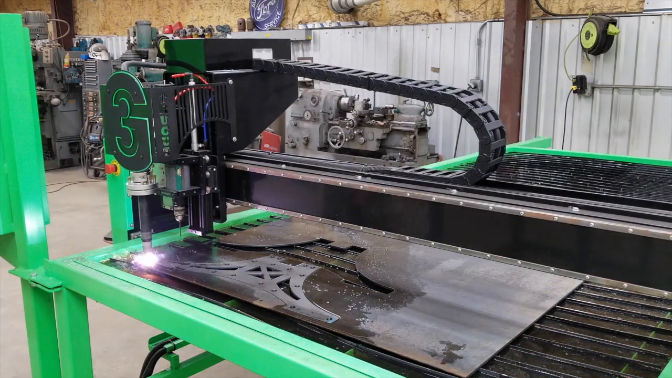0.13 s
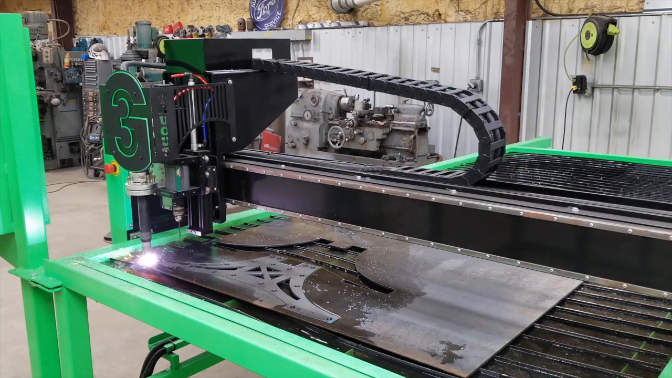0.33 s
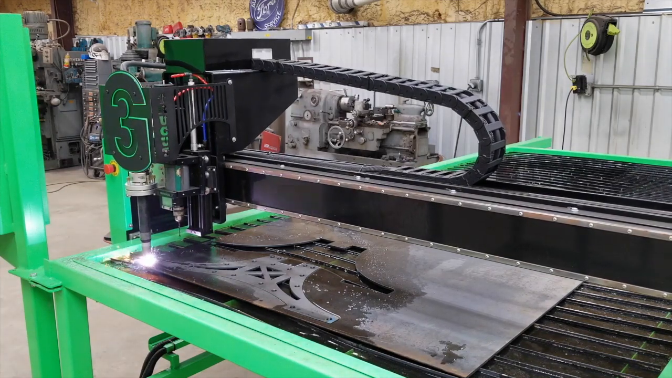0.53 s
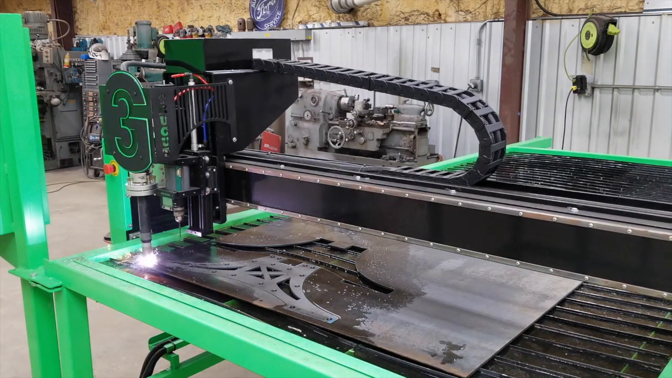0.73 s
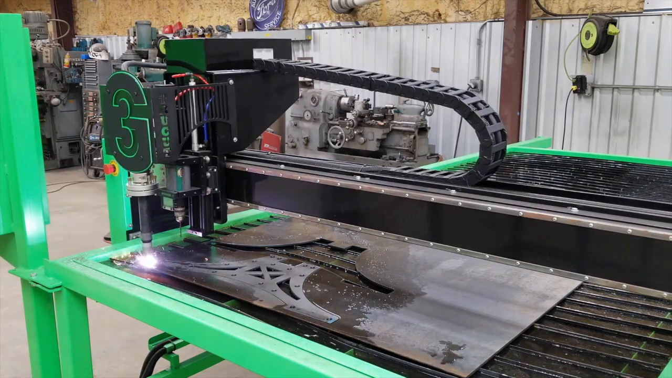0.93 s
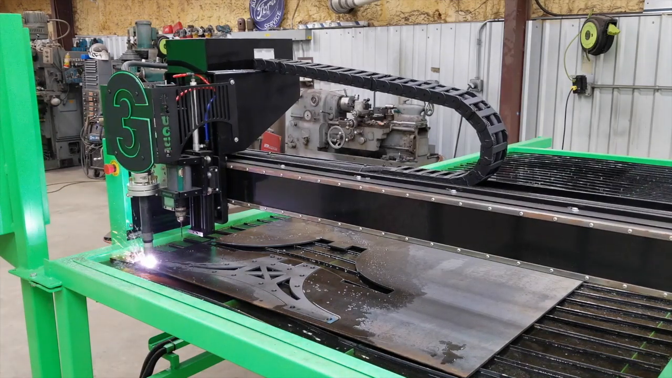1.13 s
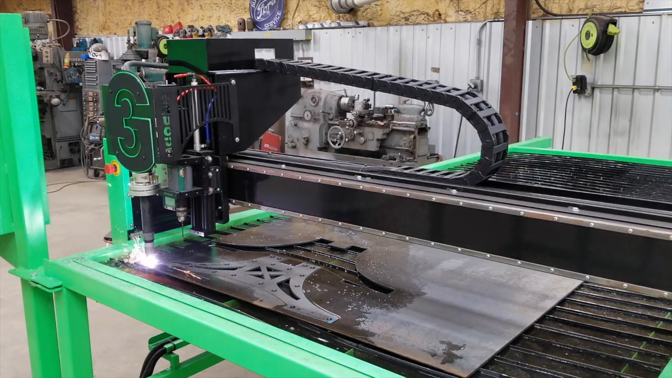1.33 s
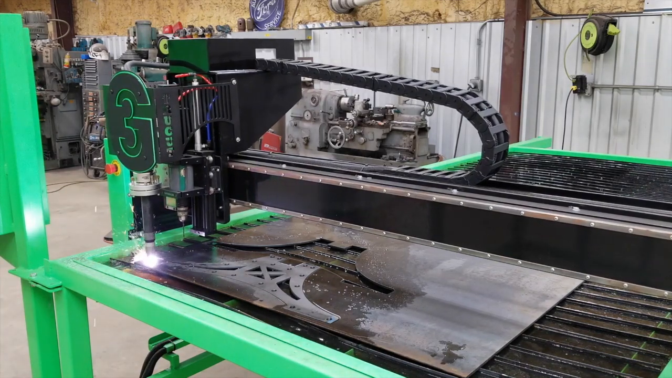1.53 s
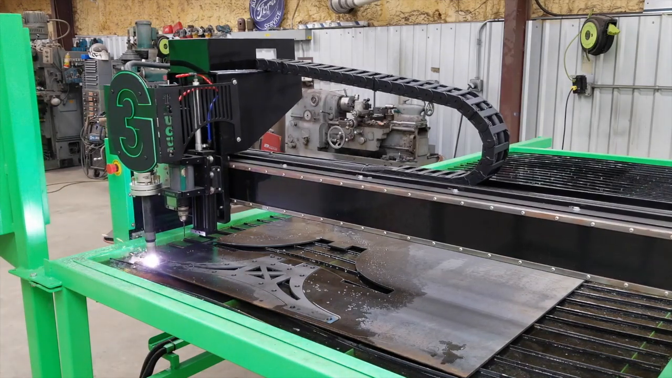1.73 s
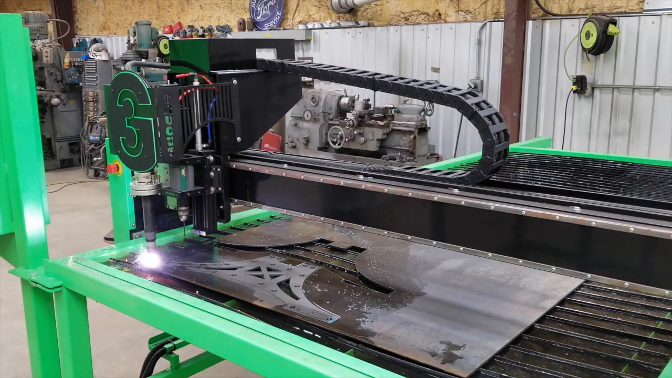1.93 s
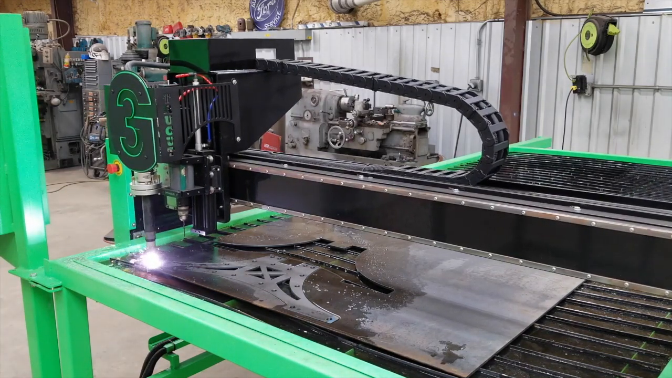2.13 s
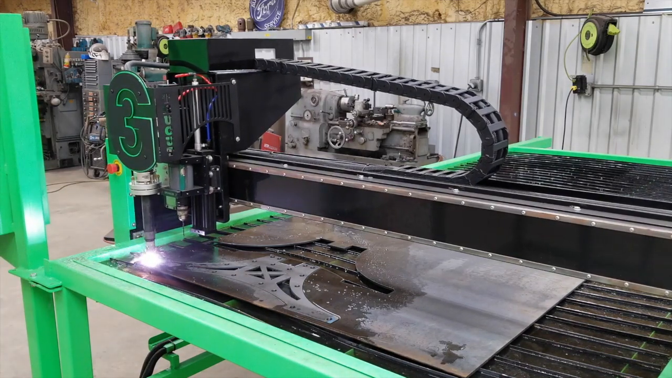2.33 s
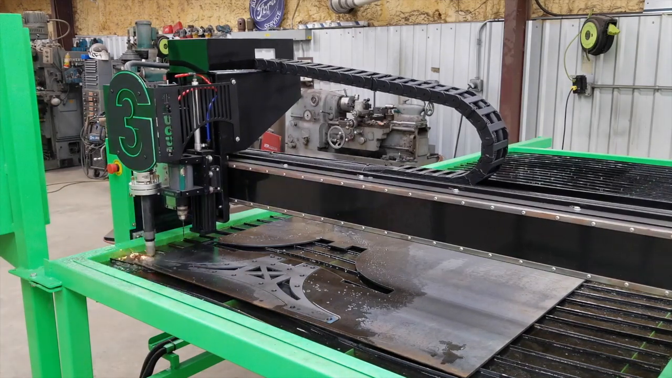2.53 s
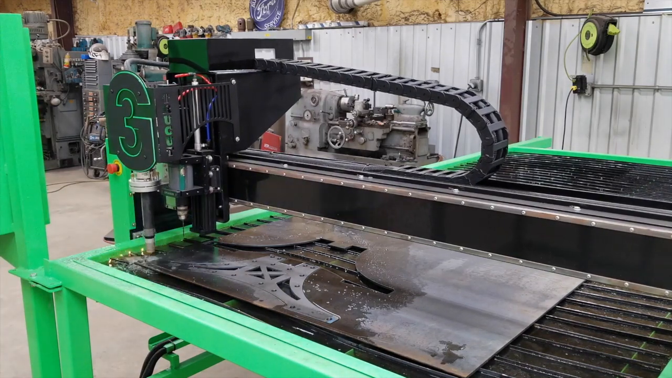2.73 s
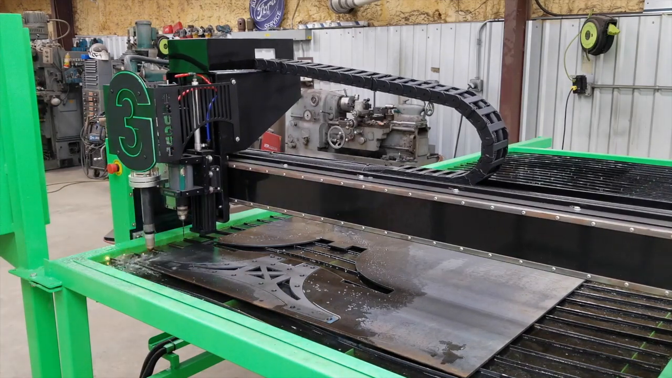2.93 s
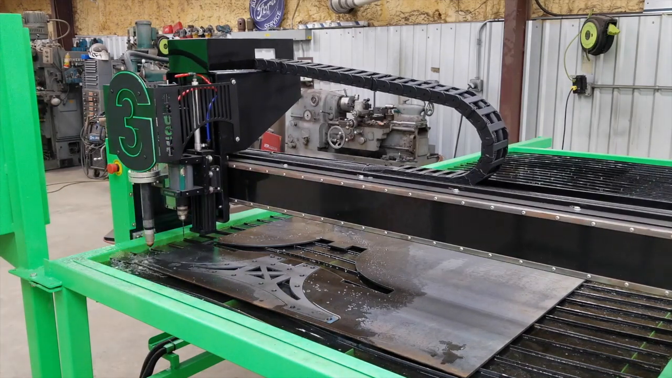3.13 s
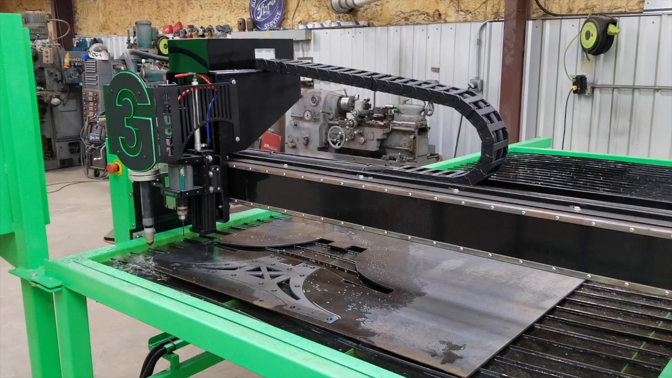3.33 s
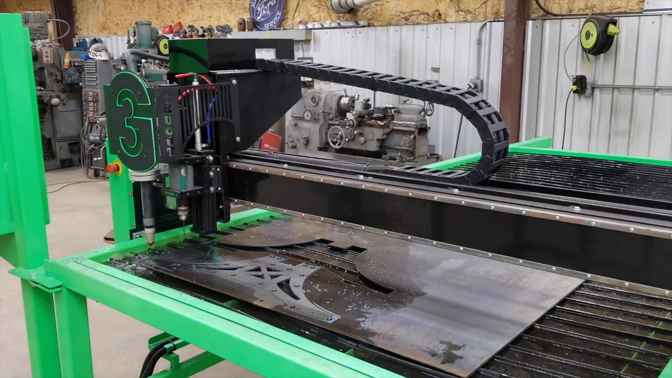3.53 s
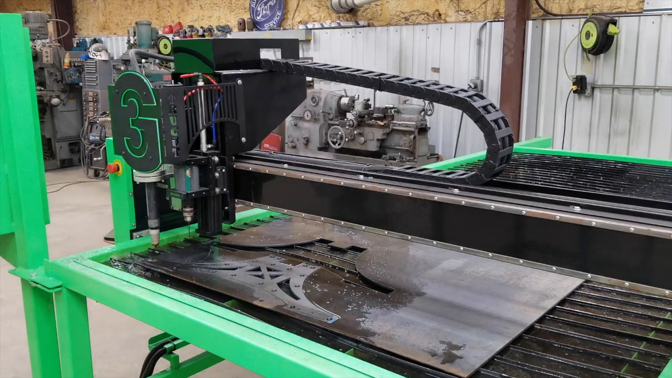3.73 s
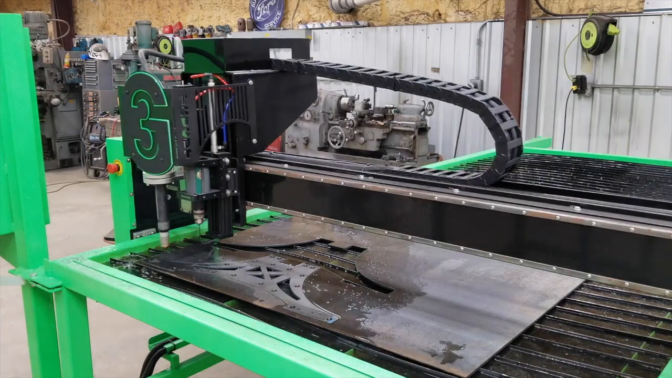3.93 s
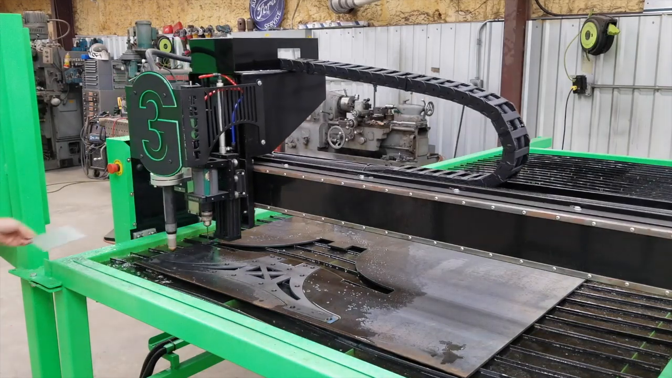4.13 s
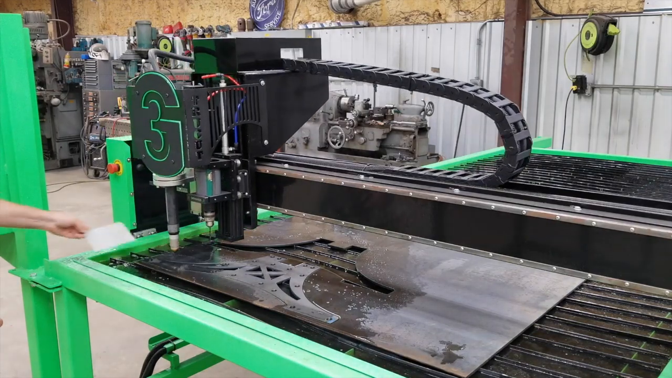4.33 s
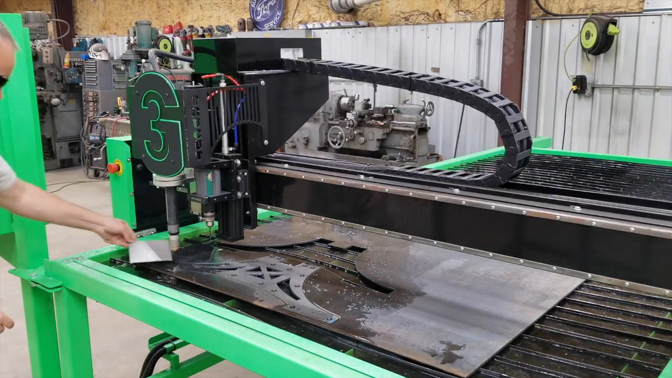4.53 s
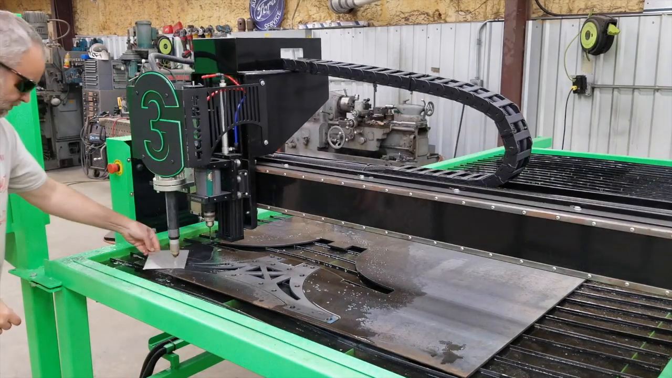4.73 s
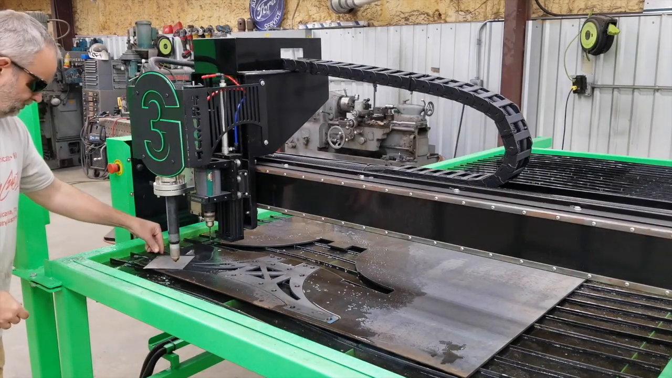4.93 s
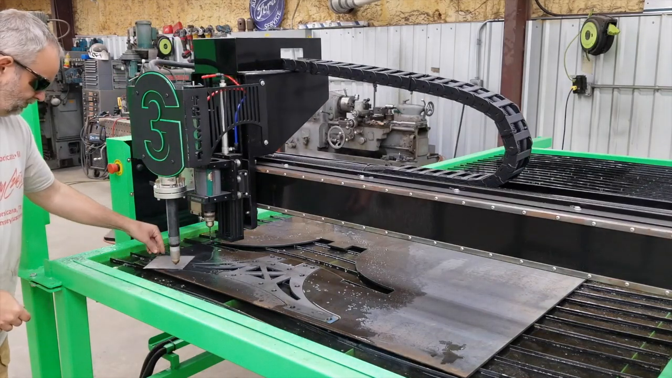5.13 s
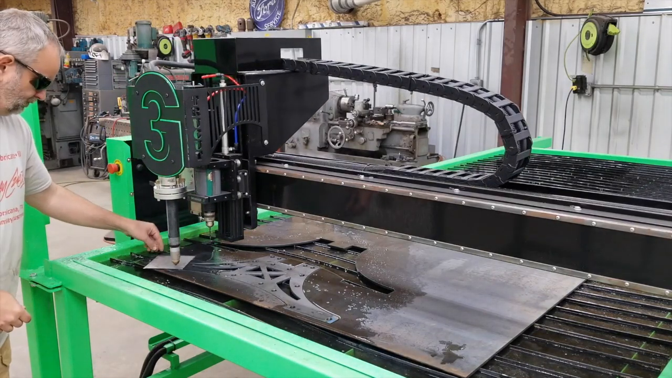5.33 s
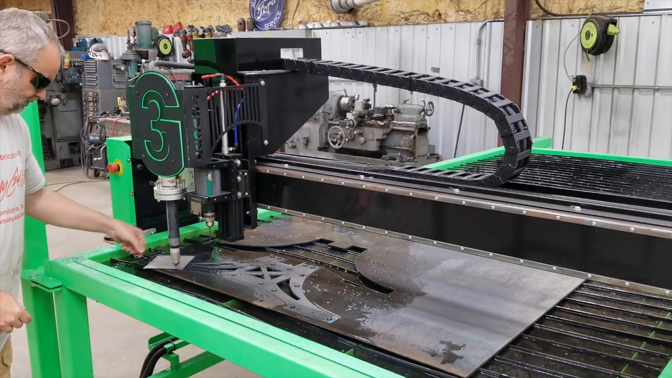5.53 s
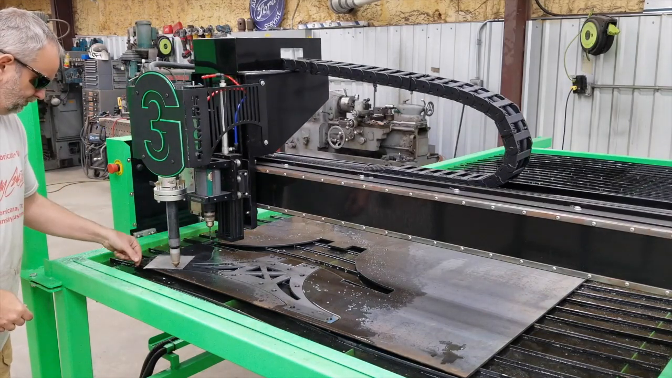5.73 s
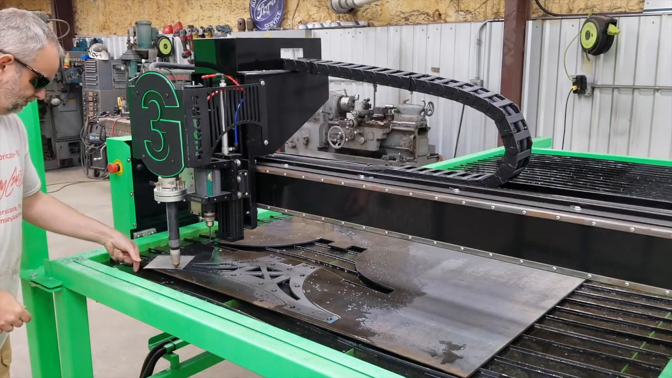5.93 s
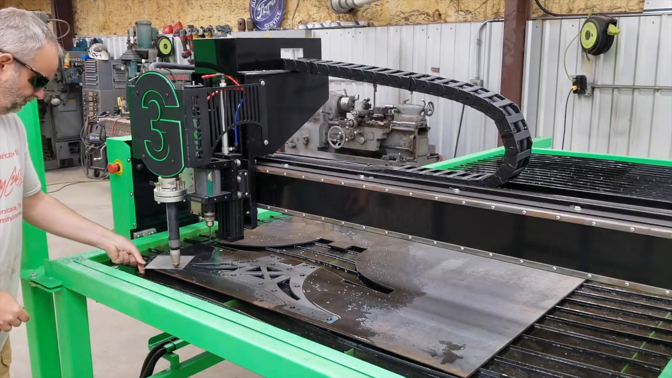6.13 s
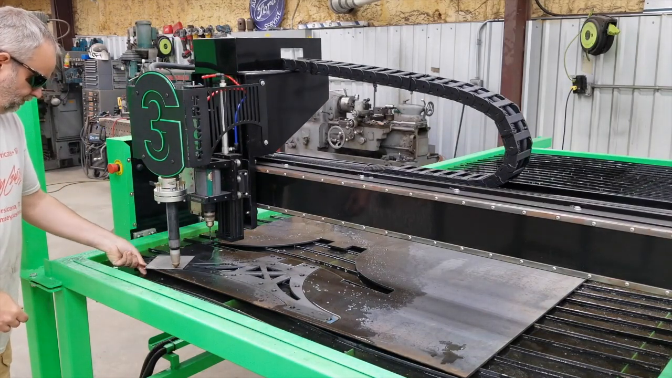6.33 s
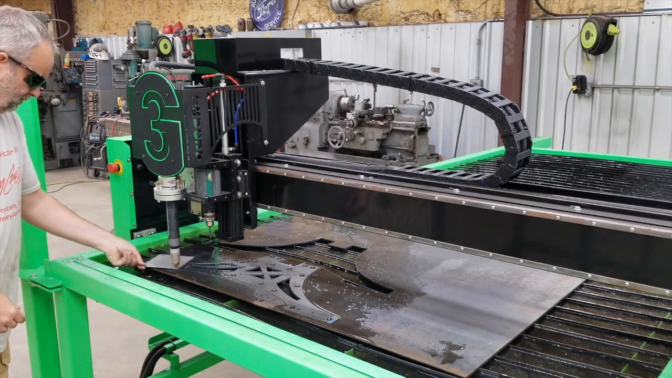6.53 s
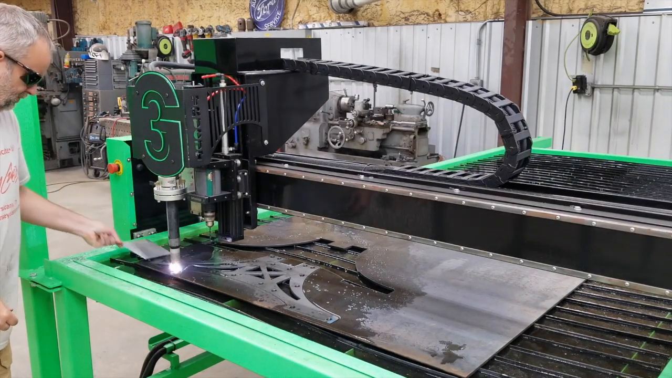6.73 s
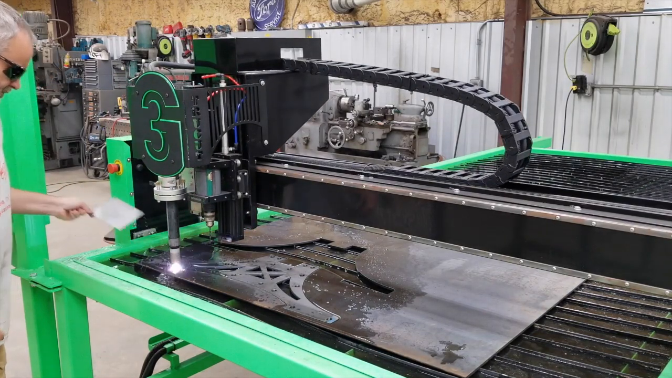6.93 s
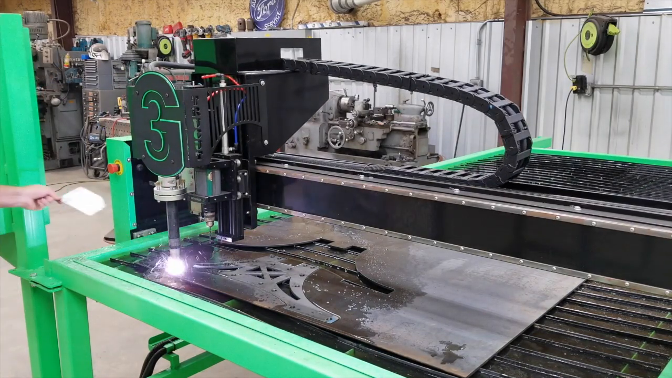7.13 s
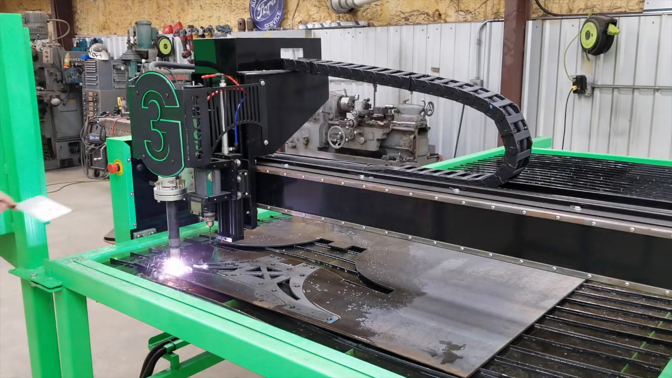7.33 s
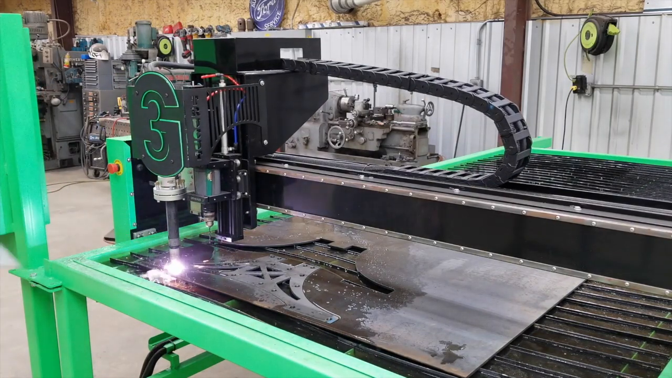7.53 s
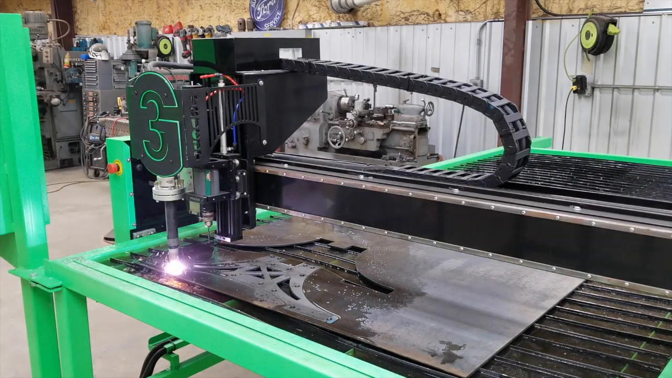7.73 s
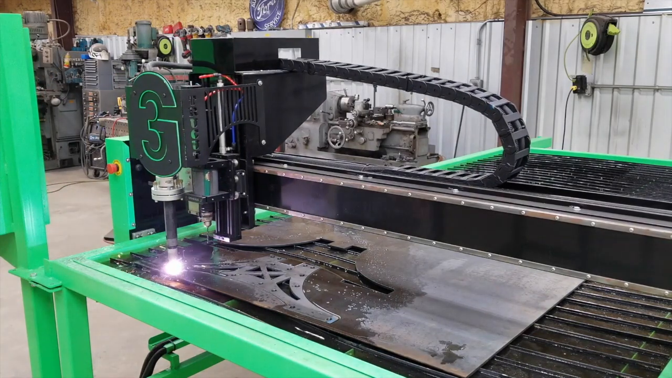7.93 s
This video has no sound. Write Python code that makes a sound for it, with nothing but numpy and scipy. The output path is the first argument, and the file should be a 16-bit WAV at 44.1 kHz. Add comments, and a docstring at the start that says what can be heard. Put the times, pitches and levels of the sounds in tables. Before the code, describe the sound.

A plasma torch hisses and gurgles over water as it finishes a cut, hisses on coldly while moving, pauses, then strikes and cuts again.

```python
"""In a humming workshop, a plasma torch ends a cut in steel plate over a water table, travels and starts the next.
Its jet is shaped noise that hisses, harder under the arc; it stops for a moment before the arc strikes.
It whips the water into bubbles, crowds of short rising tones with the tray ringing along, and it howls and spits
as gliding bands of noise. One motor sings in overtones during the travel; another, holding, whines thinly."""
import sys
import numpy as np
from scipy import signal
from scipy.fft import rfft, irfft, next_fast_len
from scipy.io import wavfile
from scipy.ndimage import uniform_filter1d

SR = 44100
rng = np.random.default_rng(int(sys.argv[2]) if len(sys.argv) > 2 else 0)


def log_audio(samples):
    """Write samples as a 16-bit WAV file to the path given in sys.argv[1]."""
    # one column per channel
    frames = np.atleast_2d(samples).T
    # limit to full scale, then quantise
    limited = np.clip(frames, -1, 1)
    pcm = np.round(limited * 32767).astype(np.int16)
    wavfile.write(sys.argv[1], SR, pcm)


N = 356769


def gain_of(db):
    """Decibels to an amplitude factor."""
    return np.exp(np.asarray(db) * np.log(10) / 20)


def evened(x):
    """Scales to rms 1."""
    return x / np.sqrt(np.mean(x ** 2) + 1e-20)


def read(points, hz):
    """A spectrum table at the given frequencies, interpolated over log frequency."""
    f, value = np.transpose(points)
    return np.interp(np.log(hz + 1), np.log(f + 1), value)


def play(tables, t, size=60):
    """Level factor and other columns of curve tables at times t; silent between the tables."""
    s, *columns = np.transpose(np.concatenate(tables))
    level_db, *rest = (np.interp(t, s, c) for c in columns)
    on = sum((t >= rows[0][0]) & (t <= rows[-1][0]) for rows in tables)
    level = uniform_filter1d(gain_of(level_db) * on, size=size)
    return level, *rest


def wobble(per_s):
    """Slow chance of rms 1, up to about per_s turns a second."""
    smoother = signal.butter(2, min(per_s / 238.0, .99))
    coarse = signal.lfilter(*smoother, rng.standard_normal(N // 100 + 2))
    return np.interp(np.arange(N) / 100, np.arange(len(coarse)), evened(coarse))


def slowly(t):
    """Every hundredth value of t, for controls that change slowly."""
    return t[::100]


def humps(t, at, rise, fall, height):
    """Smooth swells that peak at the given times."""
    away = t[:, None] - at
    return (height * np.exp(-(away / np.where(away < 0, rise, fall)) ** 2)).sum(axis=1)


def ring(x, hz, width_hz):
    """A fixed resonance of gain 1 at its peak."""
    return signal.lfilter(*signal.iirpeak(hz, hz / width_hz, SR), x)


def between(span, t):
    """1 inside the span, 0 outside, with soft edges."""
    return np.clip(np.minimum(t - span[0], span[1] - t) / .02, 0, 1)


# The arc is out in this span: start_s, end_s
ARC_OUT_SPAN = (2.47, 6.7)


def hiss(colours, control, lo_hz, hi_hz, patchy_db, usual_db, size):
    """Two unrelated noises from random short-time spectra; one colour with the arc lit, one with it out."""
    hop = size // 4
    frames, hz = N // hop + 5, np.fft.rfftfreq(size, 1 / SR)
    *parts, patches = rng.standard_normal((frames, len(hz), 5)).T
    patches = uniform_filter1d(patches, size=7, axis=0)
    patches = evened(uniform_filter1d(patches, size=12, axis=1))
    t = np.arange(frames) * hop / SR
    lit, out = (read(colour, hz)[:, None] for colour in colours)
    shape = gain_of(lit + (out - lit) * between(ARC_OUT_SPAN, t))
    # the level curve sets the band from lo_hz to hi_hz
    band = (hz > lo_hz) & (hz < hi_hz)
    shape = shape / np.sqrt(np.sum(shape[band] ** 2, axis=0) / len(hz))
    # the part below lo_hz tilts against that band
    lower = np.clip(3 * np.log2(lo_hz / (hz[:, None] + 1)), 0, 1)
    tilt_db = control(t)[1] - usual_db
    z = np.array([parts[0] + 1j * parts[1], parts[2] + 1j * parts[3]])
    scale = np.std(signal.istft(z[0], nperseg=size)[1]) / np.sqrt(2)
    z *= shape * gain_of(patchy_db * patches + lower * tilt_db)
    noise = signal.istft(z, nperseg=size, noverlap=size - hop)[1][:, :N] / scale
    return control(np.arange(N) / SR)[0] * noise


def sliding(tables, width_hz):
    """Noise in a resonance that follows a pitch curve: a low-passed noise shifted up."""
    level, hz = play(tables, np.arange(N) / SR)
    a, b = signal.lfilter(*signal.butter(2, width_hz / SR), rng.standard_normal((2, 2, N)))
    carrier = np.exp(2j * np.pi * np.cumsum(hz) / SR)
    return level * evened(((a + 1j * b) * carrier).real)


# Colour of the workshop hum: pitch_hz, relative_density_db (per Hz)
SHOP_COLOUR = [(20, -19), (50, -22.5), (110, -12), (170, -9.5), (210, -6), (260, 5.5), (330, -2), (420, 2),
               (530, -3.5), (620, 4), (800, -0.5), (1030, -2), (1110, -9), (2500, -13), (3400, -12.5),
               (6000, -8), (15800, -9)]
# Drifting level of the hum: time_s, level_db, rumble_db (against the level)
SHOP_COURSE = [(0.0, -38.5, -19.5), (2.4, -35.5, -18), (2.63, -40.5, -17.5), (3.5, -42.5, -13),
               (4.0, -38.5, -15.5), (6.6, -37.5, -13.5), (7.1, -38.5, -23), (8.09, -41.5, -14)]


def shop():
    """Fans and far machines: coloured noise heard at a drifting level."""
    hum = hiss((SHOP_COLOUR, SHOP_COLOUR), lambda t: play([SHOP_COURSE], t), 208, 564, 1.2,
               usual_db=-17.0, size=2048)
    return hum * gain_of(.7 * wobble(7.4))


# Fade of the holding motor: time_s, level_db
HOLDING_WHINE = [
    [(3.64, -53), (3.7, -37), (4.7, -36.5), (6.7, -36), (6.75, -47)],
]
WHINE_HZ, UNDERTONE_HZ, WHINE_WIDTH_HZ = 1001.5, 489.5, 8


def whine():
    """A motor holding its place: a thin tone with a faint undertone, blurred by narrow noise."""
    t = np.arange(N) / SR
    tone = np.sin(2 * np.pi * WHINE_HZ * t) + .29 * np.sin(2 * np.pi * UNDERTONE_HZ * t)
    blur = evened(ring(rng.standard_normal((2, N)), WHINE_HZ, WHINE_WIDTH_HZ))
    # the frame buzzes just below the tone
    skirt = evened(ring(rng.standard_normal((2, N)), 963, 90))
    return play(HOLDING_WHINE, t)[0] * (evened(tone) + 0.12 * blur + 0.5 * skirt)


# Runs of the travel motor: start_s, end_s, pitch_hz, level_db, overtones_db (against the level)
TRAVEL_RUNS = [(2.97, 3.56, 829, -43, -12), (4.24, 4.7, 827.5, -42, 5.5)]
TRAVEL_WAVER_DB, TRAVEL_WAVER_HZ = 3.5, 4


def drive():
    """A running motor sings: a tone and two overtones that waver in pitch and level."""
    t, out = np.arange(N) / SR, 0
    for start, end, hz, db, overtones_db in TRAVEL_RUNS:
        turn = 2 * np.pi * np.cumsum(hz + TRAVEL_WAVER_HZ * wobble(8)) / SR
        for k, more_db in enumerate((0, overtones_db, overtones_db)):
            level = gain_of(db + more_db + TRAVEL_WAVER_DB * wobble(8))
            out = out + np.sqrt(2) * between((start, end), t) * level * np.sin((k + 1) * turn)
    return out


# Water under the arc, one table a cut: time_s, level_db, pitch_spread_oct, pitch_shift_oct
GURGLE_COURSE = [
    [(0.0, -31, 0.48, -0.16), (0.35, -34, 0.58, 0.11), (0.75, -34, 0.42, 0.32), (1.2, -35.5, 0.43, 0.2),
     (1.5, -32.5, 0.4, -0.096), (1.66, -29.5, 0.58, 0.12), (1.8, -25, 0.58, 0.099),
     (2.05, -23.5, 0.51, 0.022), (2.3, -25, 0.74, 0.034), (2.36, -25.5, 0.44, 0.021),
     (2.47, -26, 0.77, .05), (2.6, -40, 1, .05)],
    [(6.72, -36.5, 0.97, -.2), (7.0, -34, 1.1, -.2), (7.25, -30, 1.15, -.1), (7.36, -35.5, 1.05, -.1),
     (7.7, -33, 0.79, -.3), (8.02, -32.5, 0.92, -.2), (8.09, -20.5, 0.94, -0.17)],
]
# The water gulps: peak_s, half_length_s, swell_db, pitch_shift_oct
WATER_GULPS = [(0.247, 0.023, 8.5, -0.76), (0.382, 0.02, 8, -0.45), (0.512, 0.1, 8.5, -0.14),
               (0.58, 0.061, 0.5, 0.069), (0.762, 0.03, 2, 0.23), (0.852, 0.016, 5, -0.48),
               (0.97, 0.055, 10, -0.19), (1.063, 0.06, 6.5, -0.36), (1.345, 0.14, 8.5, -0.14),
               (1.572, 0.05, 12, -0.082), (1.738, 0.033, 9.5, -0.066), (1.834, 0.014, 7.5, -0.15),
               (1.914, 0.02, 2.5, 0.68), (1.993, 0.031, 2, -0.22), (2.063, 0.014, 6, -0.0091),
               (2.131, 0.015, 5.5, 0.64), (2.18, 0.025, 5, 0.087), (2.22, 0.029, 2, -0.46),
               (2.305, 0.019, 5, 0.14), (2.455, 0.012, 6, -1.5), (7.04, 0.045, 5, -.2),
               (7.195, 0.024, 2.5, 0.79), (7.425, 0.04, 10.5, 0.059), (7.544, 0.037, 2.5, 0.31),
               (7.735, 0.028, 2, -0.53), (7.803, 0.027, 5, 0.58), (7.888, 0.032, 0.5, 0.26)]
# Cooling air sweeps over open water: rise_db_per_s, start_s, end_s, level_db (at start_s),
# swell_db_per_s, pitch_oct (above 1 kHz), drift_oct_per_s
AIR_SPLASHES = [(45, 3.064, 3.633, -23.5, 9, 0.43, -0.56), (112.5, 4.212, 4.67, -15, 1.5, 0.35, -0.18)]
SPLASH_FALL_DB_PER_S, SPLASH_SPREAD_OCT = 224, 0.81
# commonest bubble pitch above 1 kHz at the usual level; louder is higher
USUAL_DB, GURGLE_OCT, GURGLE_OCT_PER_DB = -30, -0.69, 0.045


def water():
    """Level, commonest pitch and spread of the bubbles: gurgle and gulps under the arc, splashes under air."""
    t = np.arange(0, N, 25) / SR
    at, half, swell_db, shift = np.transpose(WATER_GULPS)
    level, spread, lean = play(GURGLE_COURSE, t, size=3)
    level = level * gain_of(humps(t, at, half, half, swell_db))
    louder_db = 20 * np.log10(level + 1e-9) - USUAL_DB
    centre = GURGLE_OCT + lean + GURGLE_OCT_PER_DB * louder_db + humps(t, at, half, half, shift)
    for rise, start, end, db, swell, octave, drift in AIR_SPLASHES:
        into = np.clip(t, start, end) - start
        before, after = np.maximum(start - t, 0), np.maximum(t - end, 0)
        splash = gain_of(db + swell * into - rise * before - SPLASH_FALL_DB_PER_S * after)
        # the louder of gurgle and splash sets the pitch
        centre = np.where(splash > level, octave + drift * into, centre)
        spread = np.where(splash > level, SPLASH_SPREAD_OCT, spread)
        level = np.maximum(level, splash)
    return [np.interp(np.arange(N) / SR, t, c) for c in (level, np.clip(centre, -2, 2), spread)]


# Plate and tray ring with these modes: pitch_hz, width_hz, level_db (before tray_db)
TRAY_MODES = [(270, 29, -13), (422, 28, 1), (580, 43, 1), (649, 14, 3.5), (713.6, 15, -0.5),
              (836, 16, -5.5), (1086, 38, -4.5), (1139, 27, 4.5), (1447, 65, 0), (1660, 130, -2.5),
              (1893, 39, 3.5), (2090, 17, 12), (2320, 21, 3), (2540, 150, 3), (3150, 310, 0.5),
              (4570, 520, 6.5)]
TRAY_WAVER_DB = 3  # how each mode comes and goes
SPRAY_HZ, SPRAY_WIDTH_HZ, SPRAY_DB = 3970, 2750, 6  # cold air tears fine spray off the water


def bubbles(per_s, cycles, uneven_db, clumps_db, tray_db):
    """Short rising tones of random size, in two unrelated crowds; the tray rings along."""
    level, centre, spread = water()
    spread = np.clip(spread, .15, 3)
    size = next_fast_len(N + SR // 5)
    out, octaves = 0, np.linspace(-2, 2.6, num=24)
    strength_db = uneven_db * np.minimum(rng.exponential(1, (2, N)), 4)
    hits = (rng.random((2, N)) < per_s / SR) * gain_of(strength_db)
    kind = rng.integers(0, len(octaves), (2, N))
    away = (octaves[kind] - centre) / spread
    away = away * np.where(away < 0, 1.4, 1)  # large bubbles are weaker
    hits = hits * np.exp(-away ** 2 / 4) / np.sqrt(spread)
    for k, octave in enumerate(octaves):
        hz = 1000 * 2 ** octave
        turns = np.arange(int(4 * cycles * SR / hz)) * hz / SR
        tone = np.sin(2 * np.pi * turns * (1 + 0.0076 * turns))
        tone = tone * np.exp(-turns / cycles) * (1 - np.exp(-turns))
        out = out + rfft(hits * (kind == k), size) * rfft(tone / np.linalg.norm(tone), size)
    out = irfft(out, size)[:, :N]
    tray = sum(gain_of(db + TRAY_WAVER_DB * wobble(6)) * ring(out, hz, width)
               for hz, width, db in TRAY_MODES)
    out = out + gain_of(tray_db) * tray
    cold = between(ARC_OUT_SPAN, np.arange(N) / SR)
    out = out + gain_of(SPRAY_DB) * cold * ring(out, SPRAY_HZ, SPRAY_WIDTH_HZ)
    return level * evened(out) * gain_of(clumps_db * wobble(18.0))


TRAY_DB, TRAY_COLD_DB = 2.5, -5  # tray ringing under the arc and under cold air


def froth():
    """The whipped water: cold air makes a finer, evener froth than the arc."""
    cold = between(ARC_OUT_SPAN, np.arange(N) / SR)
    return bubbles(3500, 7.9, uneven_db=4.0 - 3.05 * cold, clumps_db=1.5 - 2.0 * cold,
                   tray_db=TRAY_DB + (TRAY_COLD_DB - TRAY_DB) * cold)


# Single large bubbles burst under the plate: peak_s, pitch_hz, level_db, half_length_s
LARGE_BUBBLES = [(0.245, 1130, -32.5, .02), (0.385, 813, -28.5, 0.013), (0.459, 1074, -30, .022),
                 (0.52, 840, -29, .018), (0.575, 1140, -27, .02), (0.764, 862, -30, .022),
                 (0.86, 718, -28, .018), (0.949, 1110, -30, .022), (1.0, 1155, -28, 0.011),
                 (1.28, 1076, -34, .022), (1.29, 842, -32, 0.023), (1.36, 832, -30, 0.016),
                 (7.2, 1200, -31, 0.014), (7.73, 423, -32.5, .03), (7.79, 670, -29, .015),
                 (7.89, 670, -31, .022)]
BLOOP_RISE_PER_S, BLOOP_ROUGH_DB = 1.0, 3.5


def bloops():
    """Each large bubble is one short, slightly rising and rough tone."""
    out, rough = np.zeros(N), gain_of(BLOOP_ROUGH_DB * wobble(60))
    for (s, hz, db, half), start in zip(LARGE_BUBBLES, rng.random(len(LARGE_BUBBLES))):
        at = np.arange(round((s - 3 * half) * SR), round((s + 3 * half) * SR))
        t = at / SR - s
        turns = start + hz * t * (1 + BLOOP_RISE_PER_S * t / 2)
        out[at] += np.sqrt(2) * gain_of(db) * np.exp(-(t / half) ** 2) * np.sin(2 * np.pi * turns)
    return out * rough


# First table: the workshop hum swells near 340 Hz; the others are howls of the jet:
# time_s, level_db, pitch_hz
HUM_SWELL_AND_HOWLS = [
    [(3.66, -40, 327), (3.95, -33, 340), (4.05, -40, 355)],
    [(4.08, -45, 1000), (4.15, -30, 950), (4.3, -25, 840), (4.45, -25, 790), (4.55, -51, 800)],
    [(6.8, -36, 650), (6.83, -31, 620), (6.91, -31, 592), (6.94, -45, 606)],
    [(7.05, -42, 1050), (7.08, -29, 1090), (7.11, -30, 800), (7.142, -24, 430), (7.17, -38, 404)],
]
# A higher, broader howl of the jet: time_s, level_db, pitch_hz
HIGH_JET_HOWL = [(4.03, -44, 1620), (4.08, -24.5, 1585), (4.15, -28, 1523), (4.19, -18.5, 1520),
                 (4.23, -15, 1310), (4.26, -26, 1210), (4.29, -45, 1150)]


def hum_swell_and_howls():
    """A swell of the workshop hum, then howls of the jet: bands of noise that glide in pitch."""
    return sliding(HUM_SWELL_AND_HOWLS, width_hz=150) + sliding([HIGH_JET_HOWL], width_hz=300)


# The arc strikes: time_s, level_db, pitch_hz
ARC_STRIKE = [(6.72, -36, 3400), (6.724, -18, 2700), (6.73, -22, 1700), (6.737, -23, 1250),
              (6.741, -40, 950)]


def strike():
    """The striking arc gives a very short band of noise that falls in pitch."""
    return sliding([ARC_STRIKE], width_hz=900)


# Spray as the air leaves the water, then as the arc pierces the plate: time_s, level_db, pitch_hz
SPRAY_SPITS = [
    [(4.6, -34, 4000), (4.69, -23, 4300), (4.72, -19.5, 4800), (4.75, -40, 4800)],
    [(6.84, -38, 5000), (6.915, -21, 5000), (6.96, -27, 4800), (6.99, -40, 4800)],
]


def spits():
    """The jet spits spray: short broad bursts of noise."""
    return sliding(SPRAY_SPITS, width_hz=2200)


# Course of the jet, one table before the gas valve shuts, one from the strike:
# time_s, treble_level_db, lower_hiss_db (against the treble)
JET_COURSE = [
    [(0.0, -16.5, -10.5), (1.8, -16.5, -9), (2.15, -14, -10), (2.4, -16.5, -12.5), (2.46, -14, -10.5),
     (2.48, -25, -7), (2.53, -27, -3), (2.79, -22, -6.5), (2.9, -17.5, -9.5), (2.93, -21, -4.5),
     (3.16, -25.5, -2.5), (3.57, -24, -4.5), (3.7, -24, -9), (4.07, -22, -10.5), (4.29, -19.5, -5),
     (4.72, -19, -6), (4.94, -17.5, -11.5), (5.14, -22, -7), (5.2, -22, -4), (6.53, -21, -7.5),
     (6.6, -40.5, 7.5), (6.64, -50, 15)],
    [(6.7155, -26, -6), (6.717, -17, -9), (6.724, -12.5, -13), (6.93, -12, -12), (7.01, -15, -13.5),
     (7.38, -15, -14.5), (7.64, -18.5, -13.5), (8.09, -17, -11)],
]
# Jet colour under the arc: pitch_hz, relative_density_db (per Hz)
LIT_COLOUR = [(1470, -13.5), (2500, -10.5), (3010, -6.5), (3270, -5), (4490, -1.5), (5240, -7), (6260, -8),
              (6970, -6), (8860, -13), (11200, -4), (12200, -5), (13700, -3), (14900, -3), (15800, -3.5)]
# Jet colour with the arc out: pitch_hz, relative_density_db (per Hz)
COLD_COLOUR = [(760, -49), (1300, -13.5), (1400, -16.5), (1520, -16), (1840, -8), (2220, -13.5),
               (2650, -8.5), (3030, -4.5), (3260, -8.5), (3620, -4), (5790, -9.5), (7930, -5.5), (9180, -8),
               (12800, -1.5), (14800, -5), (15800, 0)]
# The arc flares and the hiss swells: peak_s, swell_db
ARC_FLARES = [(0.03, 0.5), (0.21, 0.5), (0.6, 1), (0.74, 0), (0.81, 1.5), (0.94, 2), (1.16, 0), (1.33, 2),
              (1.4, 0.5), (7.36, 1), (7.53, 3), (7.72, 2), (7.82, 2.5), (7.95, -1.5), (8.03, 1.5)]
FLARE_RISE_S, FLARE_FALL_S, ARC_WANDER_DB = 0.047, 0.032, 0.75


def jet():
    """Turbulent gas hiss, coloured otherwise when the arc is out; it flutters as the arc wanders and flares."""
    colours = [(300, -45)] + LIT_COLOUR, [(300, -45)] + COLD_COLOUR
    at, swell_db = np.transpose(ARC_FLARES)
    s = slowly(np.arange(N) / SR)
    wander_db = ARC_WANDER_DB * slowly(wobble(29)) * (1 - between(ARC_OUT_SPAN, s))
    flare_db = humps(s, at, FLARE_RISE_S, FLARE_FALL_S, swell_db) + wander_db

    def control(t):
        level, lower_db = play(JET_COURSE, t)
        return level * gain_of(np.interp(t, s, flare_db)), lower_db
    noise = hiss(colours, control, 8200, 14210, 2.22, usual_db=-4.5, size=512)
    return noise * gain_of(0.27 * wobble(14.0) + 0.65 * wobble(90))


# Likeness of left and right: pitch_hz, likeness (0 to 1)
SIDE_LIKENESS = [(40, .96), (125, .98), (300, .95), (600, .84), (1200, .8), (2500, .55), (6000, .35),
                 (12000, .48), (15500, .7)]
# Balance of the sides: pitch_hz, left_minus_right_db
SIDE_BALANCE = [(60, 0.3), (240, 0.4), (950, 0.7), (3770, 1.3), (9000, 0), (15000, 0.3)]


def ports(pair, lead_s=0, turn=((1, 0), (2, 0)), likeness=SIDE_LIKENESS):
    """Right gets partly the left's sound, lead_s later or turned in phase, and partly the pair's second."""
    size = next_fast_len(N)
    hz, (a, b) = np.fft.rfftfreq(size, 1 / SR), rfft(pair, size)
    same = np.clip(read(likeness, hz), 0, 1)
    lean = gain_of(read(SIDE_BALANCE, hz) / 2)
    delay = np.exp(-2j * np.pi * hz * lead_s - 1j * read(turn, hz))
    right = same * a * delay + np.sqrt(1 - same ** 2) * b
    return irfft(np.array([a * lean, right / lean]), size)[:, :N]


def echoes(x, level_db, t60):
    """Near steel surfaces: scattered reflections, other ones at each side, weak in the bass."""
    t = np.arange(3000) / SR
    signs = rng.choice([-1., 1.], (2, len(t)))
    taps = signs * (rng.random((2, len(t))) < 1500 / SR) * gain_of(-60 * t / t60)
    taps = signal.lfilter(*signal.butter(2, 700 / (SR / 2), "high"), taps)
    reflected = signal.oaconvolve(x, taps / np.linalg.norm(taps[0]), axes=1)[:, :N]
    return x + gain_of(level_db) * reflected


# Phase by which left leads for sound from the torch: pitch_hz, lead_rad
TORCH_PHASE = [(100, 0.04), (350, 0.3), (1030, 0.7), (1720, 1.2), (3100, 2.5), (4300, 2.4), (5800, -0.5),
               (7900, 0.2), (10000, 0.7), (11400, 3.1), (12750, 3.45), (14100, 4.7), (15500, 6.3)]
FAR_LEFT_LEAD_S = .000018  # the torch starts further left
MOVE_START_S, MOVE_END_S = 2.9, 4.2


def scene():
    """The torch and the water are to the left, the holding motor to the right."""
    t = np.arange(N) / SR
    left = jet() + froth() + bloops() + drive() + hum_swell_and_howls() + strike() + spits()
    moved = np.interp(t, (MOVE_START_S, MOVE_END_S), (0, 1))
    dry = ports(left * (1 - moved), FAR_LEFT_LEAD_S, TORCH_PHASE)
    dry = dry + ports(left * moved, turn=TORCH_PHASE) + ports(shop(), .00003)
    holding = ports(whine(), -0.00026, likeness=[(400, 1.0), (1000, 1.0)])
    return echoes(dry, level_db=-11, t60=0.14) + holding


EDGE_HZ = 15735


def record(dry):
    """Peaks clip, the deepest bass is cut, and a steep low-pass ends the band."""
    clipped = np.clip(dry, -1, 1)
    lean_bass = signal.lfilter(*signal.butter(1, 30 / (SR / 2), "high"), clipped)
    low_pass = signal.firwin(2047, EDGE_HZ, window=("kaiser", 9), fs=SR)
    return signal.oaconvolve(lean_bass, low_pass[None], "same")


dry = scene()
out = record(dry)
log_audio(out)
```